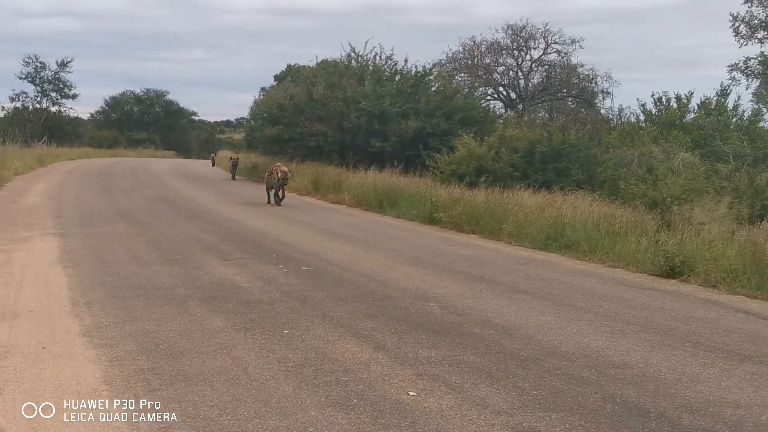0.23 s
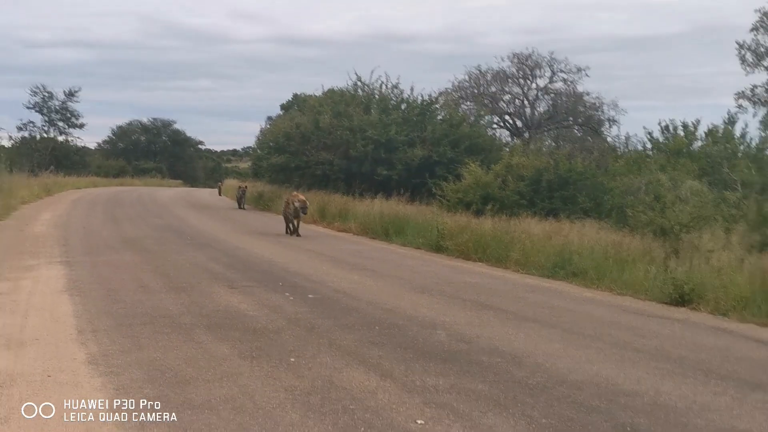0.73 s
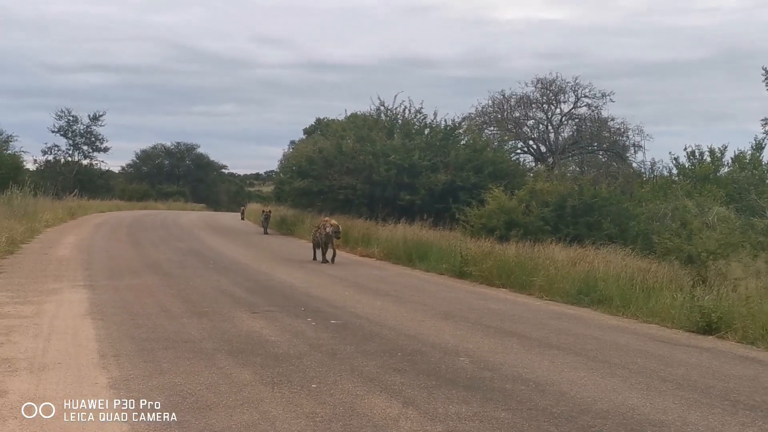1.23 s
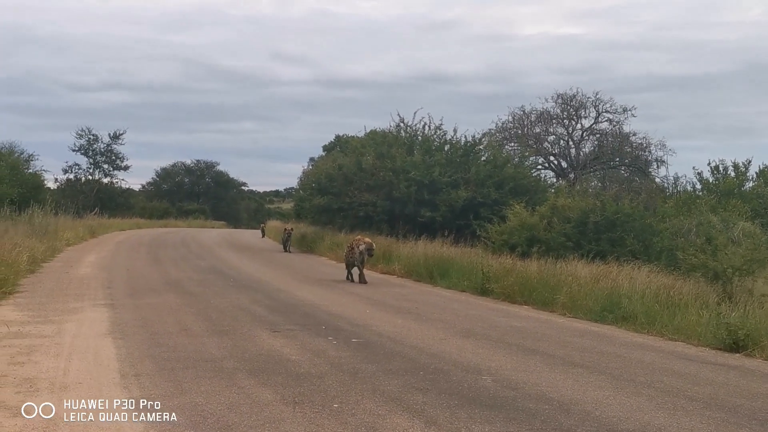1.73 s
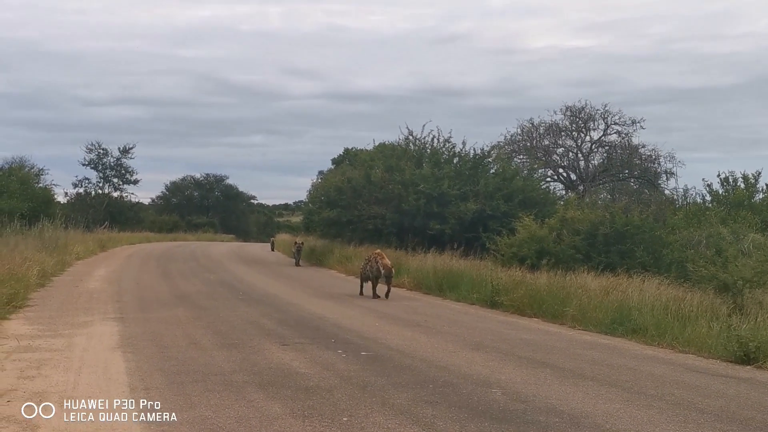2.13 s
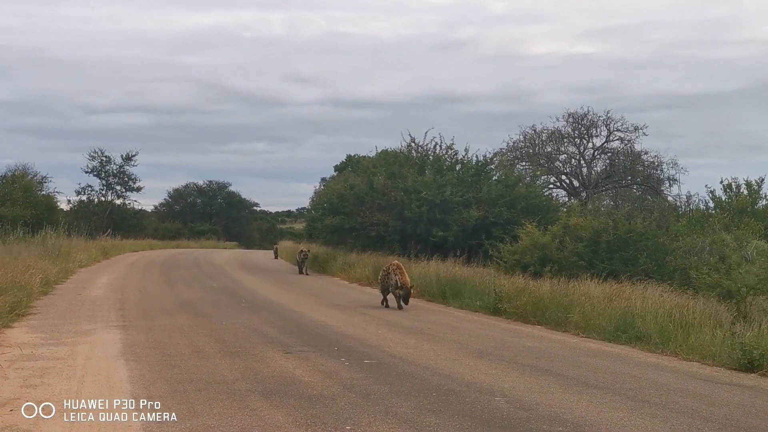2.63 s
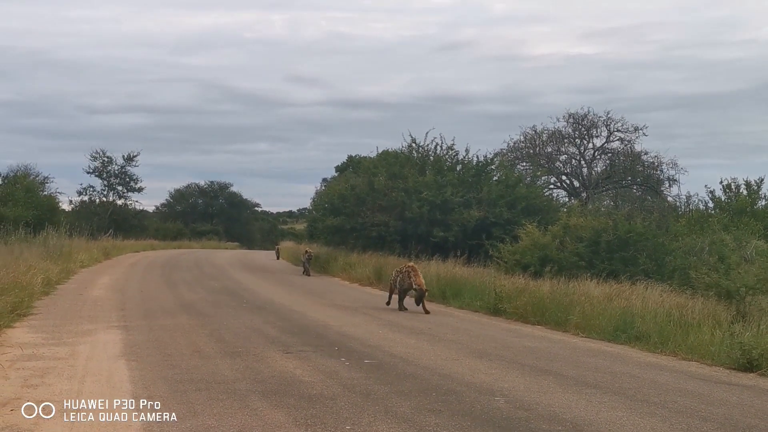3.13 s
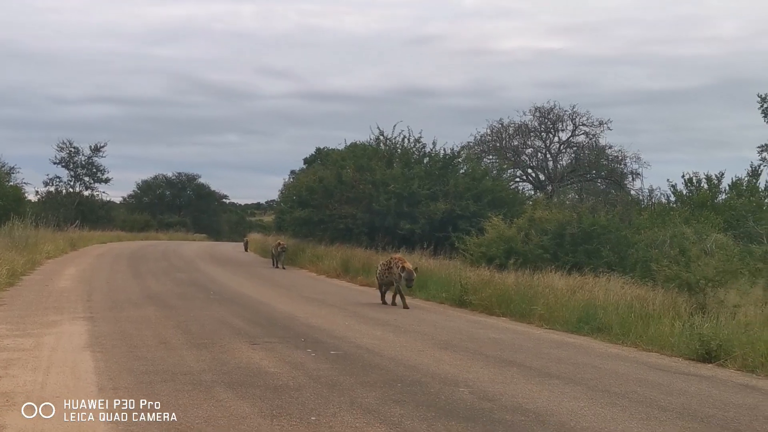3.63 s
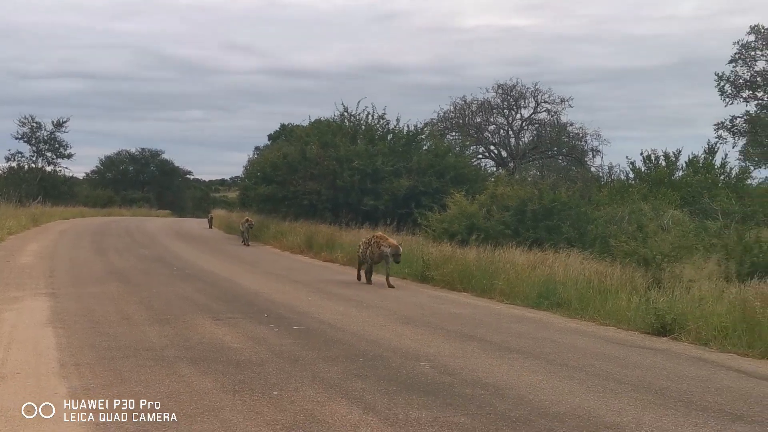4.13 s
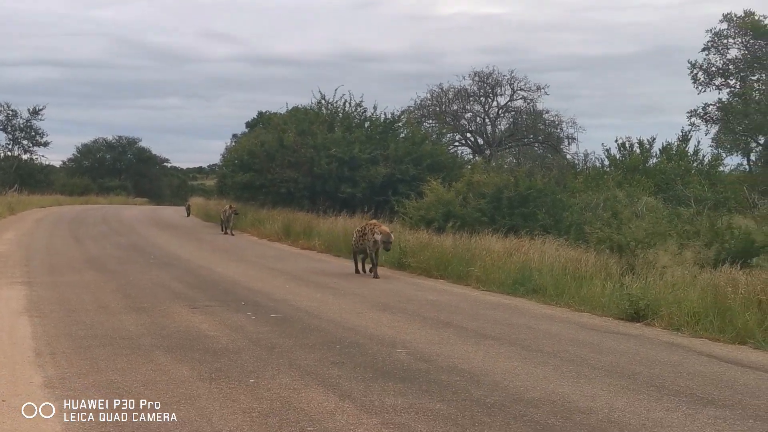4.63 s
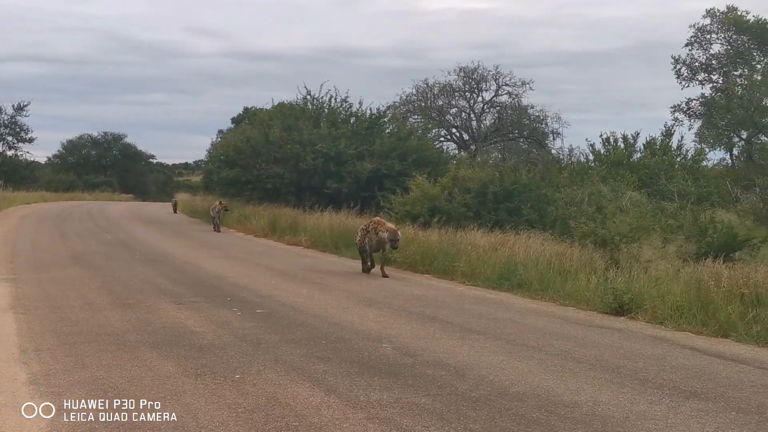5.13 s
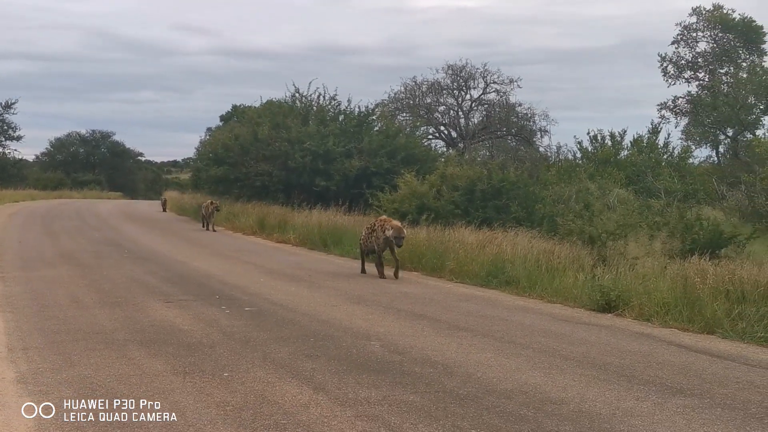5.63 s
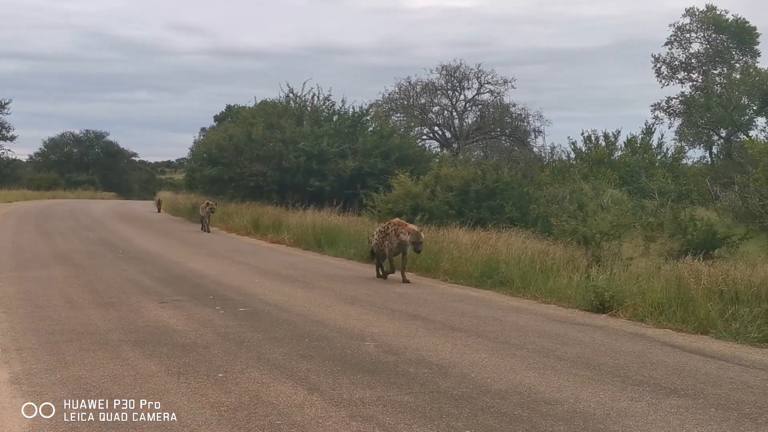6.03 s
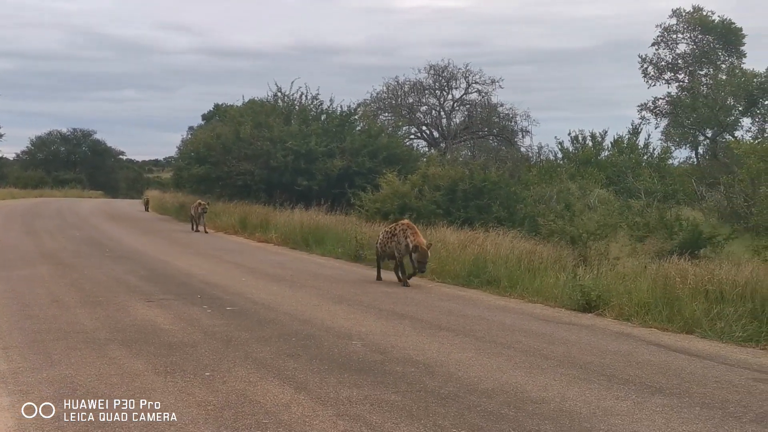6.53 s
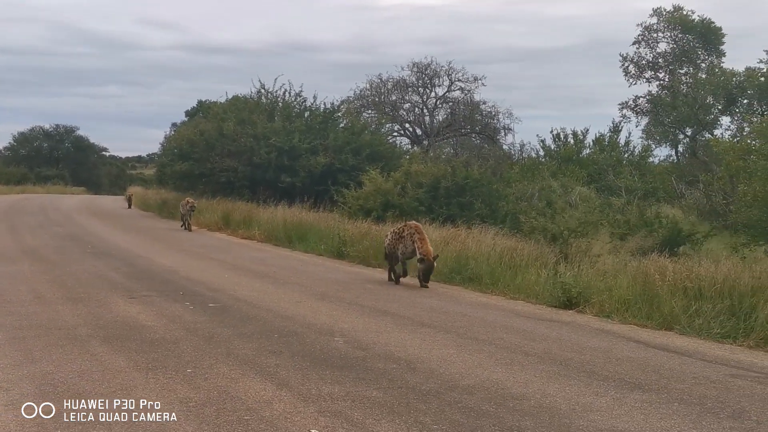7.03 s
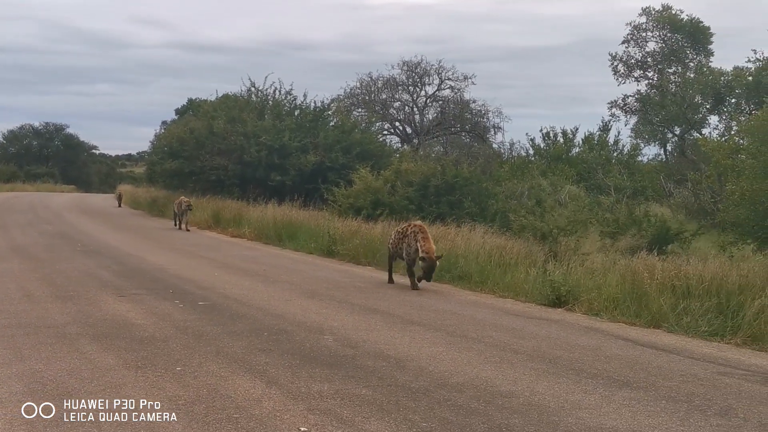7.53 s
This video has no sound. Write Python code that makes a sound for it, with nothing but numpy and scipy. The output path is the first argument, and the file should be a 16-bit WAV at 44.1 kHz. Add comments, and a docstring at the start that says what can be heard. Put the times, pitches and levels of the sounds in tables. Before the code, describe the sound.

Hand-held outdoor stereo capture from a car beside roadside grass and scrub. A nearby bird whistles quick warbled phrases, distant birds twitter softly and insects shimmer high up. A hyena calls twice, loud and hollow: a throaty growling moan swells for under a second, leaps to a clear hoot and falls abruptly, leaving a faint bush echo. A knock comes early, soft wind puffs late.

```python
"""A spotted hyena whoops twice on a road in open bush, heard from an idling car.
Each call is a sum of partials shaped by the throat: a low groan, then a rising hoot that breaks high and falls.
Songbirds are gliding sine tones; insects are a narrow band of noise, partly in pulsed bouts.
Open air and wind are coloured noise, the engine a few sines; a finger knocks and brushes the
hand-held microphone as short pulses and fading hiss. Scattered echoes stand for grass and scrub."""
import sys
import numpy as np
from scipy import signal
from scipy.fft import rfft, irfft
from scipy.io import wavfile
from scipy.ndimage import uniform_filter1d

SR = 44100
rng = np.random.default_rng(int(sys.argv[2]) if len(sys.argv) > 2 else 0)


def store_pcm(level_fs):
    """Save levels as 16-bit WAV."""
    pcm = np.round(np.clip(level_fs, -1, 1) * 32767).astype(np.int16)
    wavfile.write(sys.argv[1], SR, np.atleast_2d(pcm).T)


N = 343098
TIME = np.arange(N) / SR
BINS = np.fft.rfftfreq(N, 1 / SR)
# pitches of a whoop: start of the hoot, just after the voice breaks, and the top
HOOT_HZ, BREAK_HZ, TOP_HZ = 354.3, 544, 705


def gain_of(db):
    """Level is logarithmic: 20 dB are a factor of ten in amplitude."""
    return 10 ** (np.asarray(db) / 20)


def evened(x):
    """Mean power sets the level: scales to rms 1."""
    return x / np.sqrt(np.mean(x ** 2) + 1e-20)


def read(points, hz):
    """Spectra are interpolated on a logarithmic frequency axis."""
    f, value = np.transpose(points)
    return np.interp(np.log(hz + 1), np.log(f + 1), value)


def follow(rows, t):
    """Linear interpolation of every column of a curve table at t."""
    s, *columns = np.transpose(rows)
    return [np.interp(t, s, c) for c in columns]


def ramp(x, low, high):
    """A clipped linear transition, from 0 at low to 1 at high."""
    return np.clip((x - low) / (high - low), 0, 1)


def add(mix, s, sound):
    """Superposition: sums a sound into the mix at time s."""
    part = mix[round(s * SR):][:len(sound)]
    part += sound[:len(part)]


def waver(size, hz):
    """Low-pass noise of rms 1: a random fluctuation slower than about hz."""
    f = np.fft.rfftfreq(size, 1 / SR)
    return evened(irfft(rfft(rng.standard_normal(size)) / (1 + (f / hz) ** 4), size))


def noise(spectrum, band=(0, SR)):
    """Spectral shaping of white noise, scaled to rms 1 inside the band."""
    z = rfft(rng.standard_normal(N)) * gain_of(read(spectrum, BINS))
    in_band = (BINS >= band[0]) * (BINS <= band[1])
    return irfft(z, N) / np.std(irfft(z * in_band, N))


def ports(x, balance_db, phase=0):
    """Interchannel level and phase place a sound; the mean of the two ports is kept."""
    ratio = gain_of(balance_db) * np.exp(1j * phase)
    weights = np.array([2 * ratio / (1 + ratio), 2 / (1 + ratio)]).reshape(2, -1)
    return irfft(rfft(x) * weights, N)


def span(start, end, fade=.004):
    """Sample times of a sound and a sine-shaped envelope that avoids clicks at its edges."""
    t = np.arange(start - fade, end + fade, 1 / SR)
    from_edge = np.minimum(t - t[0], t[-1] - t)
    return t, np.sin(np.pi / 2 * np.clip(from_edge / (2 * fade), 0, 1))


def idle(left_db=5, level_db=0):
    """Periodic combustion gives a line spectrum: the firing rate and its overtones, wavering slightly."""
    # Each row: frequency in Hz, relative level in dB.
    engine_lines = [(34, -63), (68, -77.5), (102, -64.5)]
    # Each row: time in seconds, relative level in dB.
    engine_level = [(0, -6), (1.5, -7.5), (2.0, -1), (4.4, -.5), (7.8, -7)]
    clock = np.cumsum(1 + .004 * waver(N, 4.3)) / SR
    hum = np.zeros(N)
    for hz, db in engine_lines:
        hum += gain_of(db + waver(N, 4)) * np.sin(2 * np.pi * (hz * clock + rng.random()))
    level = gain_of(follow(engine_level, TIME)[0] + level_db)
    return ports(np.sqrt(2) * hum * level, left_db)


def open_air(air_db=-1, side_db=-5):
    """Diffuse background: a shared noise plus one in opposite phase at the two ports."""
    # Colour of the air. Each row: frequency in Hz, relative level per hertz in dB.
    air_colour = [(20, -11), (45, -5.5), (70, -15), (110, -13), (160, -13), (250, -17), (430, -20),
                  (860, -25), (1400, -25.5), (2400, -29.5), (3600, -33), (4700, -31), (5850, -40.5),
                  (15500, -48.5)]
    # Each row: time in seconds, relative level in dB.
    air_level = [(0, -71.5), (1.2, -74), (2, -71), (3.6, -69), (6.4, -72), (7.8, -65.5)]
    # Balance of the shared noise. Each row: frequency in Hz, left minus right in dB.
    air_balance = [(60, 7), (180, 7.5), (550, 2), (1650, 3.5), (4970, 14.5), (15000, -3.5)]
    mid = noise(air_colour, band=(250, 2500))
    side = noise(air_colour, band=(250, 2500))
    air = ports(mid, read(air_balance, BINS)) + gain_of(side_db) * np.array([side, -side])
    return air * gain_of(follow(air_level, TIME)[0] + air_db)


def insects(insects_db=-3, pulsing=0.74):
    """Amplitude modulation of narrow-band noise: a trill pulses in bouts over a steady far chorus."""
    # Each row: start of a bout in seconds, length in seconds, relative level in dB.
    trill_bouts = [(-.1, 1, -76), (.97, .23, -80), (1.996, .6, -81), (4.285, 0.27, -76.5), (5.45, .4, -84)]
    pulses_per_s, chorus_db = 53, -85
    band_colour = [(3800, -52), (4500, -0.5), (4800, 5), (5050, -10), (5700, -48.5)]  # Hz, dB
    shrill = np.array([noise(band_colour) for port in range(2)])
    bouts = np.zeros(N)
    for s, length, db in trill_bouts:
        bouts += gain_of(db) * np.sqrt(abs(np.sin(np.pi * ramp(TIME, s, s + length))))
    rate = pulses_per_s * (1 + 0.0405 * waver(N, 10))
    pulses = 1 + pulsing * np.sin(2 * np.pi * np.cumsum(rate) / SR)
    shrill *= gain_of(insects_db) * (bouts * pulses + gain_of(chorus_db))
    return shrill * gain_of([[2], [-1]])  # slightly stronger on the left


def finger(rebound=16.0):
    """Impulse and friction: knocks are brief pressure pulses, brushes are fading broadband hiss."""
    # Knocks on the case. Each row: time in seconds, nominal peak in dB, width in seconds.
    finger_knocks = [(0.722, -33.5, 0.000058), (.797, -14, 0.00017), (0.8452, -28.5, 0.000071),
                     (.846, -27, 0.0003)]
    # Each row: start in seconds, relative level in dB, decay time in seconds.
    finger_brushes = [(0.802, -37.5, 0.014), (.812, -53, 0.014), (1.41, -63, 0.25)]
    # Colour of a brush. Each row: frequency in Hz, relative level per hertz in dB.
    brush_colour = [(60, 32), (300, 15.5), (900, 7), (3000, 9.5), (6300, 8), (9000, 7.5), (16000, -2.5)]
    out, t = np.zeros(N), np.arange(-.01, .01, 1 / SR)
    for s, db, width in finger_knocks:
        push = np.exp(-(t / width) ** 2)
        slow_rebound = np.exp(-(t / (rebound * width)) ** 2) / rebound
        add(out, s + t[0], gain_of(db) * (slow_rebound - push))
    hiss = noise(brush_colour)
    for s, db, decay in finger_brushes:
        out += hiss * gain_of(db) * (TIME > s) * np.exp(-abs(TIME - s) / decay)
    return out


def wind():
    """Turbulent pressure at a port is low-frequency noise: single puffs and a light, uneven breeze."""
    # The strongest puffs. Each row: centre in seconds, relative level in dB, half length in seconds.
    wind_puffs = [(4.428, -52.5, .047), (5.48, -53, .06), (6.367, -52.5, .05), (6.68, -48.5, 0.079),
                  (6.888, -35.5, 0.044), (7.118, -48.5, 0.11)]
    breeze_from_s, breeze_db, gusts_db = 4.28, -64, 2.5
    rumble = noise([(10, -4.5), (30, 6.5), (66, 7.5), (110, -7), (300, -21.0), (1000, -69)])  # Hz, dB
    strength = gain_of(breeze_db + gusts_db * waver(N, 2.8))
    strength *= ramp(TIME, breeze_from_s, breeze_from_s + .5)
    for s, db, half in wind_puffs:
        strength += gain_of(db) * np.exp(-((TIME - s) / half) ** 2)
    return rumble * strength


def handling(leak_db=-36):
    """Near-field disturbance: finger and wind act on the left port and leak weakly to the right."""
    left = finger() + wind()
    return np.array([left, gain_of(leak_db) * left])


def syllable(length, pitches, db, quaver=0.015, flicker_db=2, soft=0.51):
    """Frequency modulation: a whistle glides along a polynomial through its pitches."""
    u = np.linspace(0, 1, round(length * SR))
    knots = np.linspace(0, 1, len(pitches))
    hz = np.polyval(np.polyfit(knots, pitches, len(pitches) - 1), u)
    tone = np.sin(2 * np.pi * np.cumsum(hz * (1 + quaver * waver(len(u), 90))) / SR)
    level = gain_of(db + flicker_db * waver(len(u), 100))
    return level * evened(tone * signal.windows.tukey(len(u), soft))


def phrase(level_db, top_hz, sag, edges, warble_hz=55, quaver=.009, flicker_db=2, soft=0.056):
    """Coupled frequency and amplitude modulation: one whistle sinks, dipping at each syllable's edge."""
    dip_hz, dip_growth_hz_per_s = 478, 1700  # dips deepen as the phrase goes on
    dip_fall_s, dip_rise_s = .016, 0.009  # it slides into a dip and springs out
    dip_db_per_hz = -0.0192  # and is weaker down there
    hold_s, fade_db_per_s = 0.24, -45  # the end of a long phrase fades
    t = np.arange(edges[0], edges[-1], 1 / SR)
    age = t - t[0]
    dip = np.zeros(len(t))
    for s in edges:
        depth_hz = dip_hz + dip_growth_hz_per_s * (s - t[0])
        dip += depth_hz * np.exp(-abs(t - s) / np.where(t < s, dip_fall_s, dip_rise_s))
    hz = top_hz - sag * age ** 2 - dip + warble_hz * waver(len(t), 30)
    hz *= 1 + quaver * waver(len(t), 120)
    db = level_db + dip_db_per_hz * dip + fade_db_per_s * np.maximum(age - hold_s, 0)
    db += flicker_db * waver(len(t), 78)
    tone = np.sin(2 * np.pi * np.cumsum(hz) / SR)
    return t[0], np.sqrt(2) * gain_of(db) * tone * signal.windows.tukey(len(t), soft)


def songbird():
    """Near-sinusoidal whistling: warbled phrases, single rising peeps and thin falling whistles."""
    # Each row: relative level in dB, top pitch in Hz, sag in Hz per second squared,
    # list of the edges of the syllables in seconds.
    song_phrases = [(-66, 3950, 11000, [0.996, 1.082, 1.155, 1.24]),
                    (-57, 3980, 2800, [1.414, 1.527, 1.599, 1.685, 1.768]),
                    (-54.5, 4050, 4000, [1.892, 2.006, 2.083, 2.163]),
                    (-57, 3970, 5200, [2.319, 2.435, 2.517, 2.598]),
                    (-47.5, 4085, 5000, [4.706, 4.782, 4.88, 4.966, 5.036]),
                    (-50, 3977, 4600, [5.172, 5.28, 5.353, 5.433, 5.518]),
                    (-51, 4060, 5800, [5.647, 5.759, 5.845, 5.924, 5.995])]
    # Each row: start in seconds, length in seconds, middle pitch in Hz, relative level in dB.
    rising_peeps = [(6.194, 0.06, 3680, -57), (6.282, 0.054, 3750, -54), (6.438, .036, 4220, -60.5),
                    (6.522, 0.046, 4080, -57.5)]
    # Each row: start in seconds, length in seconds, pitch at start, middle and end in Hz,
    # relative level in dB.
    falling_slurs = [(2.78, .17, 6790, 5760, 4620, -69), (3.281, .13, 6270, 5310, 3830, -60)]
    peep_rise = 0.038  # share of the pitch, either way
    out = np.zeros(N)
    for row in song_phrases:
        add(out, *phrase(*row))
    for s, length, hz, db in rising_peeps:
        add(out, s, syllable(length, (hz * (1 - peep_rise), hz * (1 + peep_rise)), db, soft=.6))
    for s, length, *pitches, db in falling_slurs:
        add(out, s, syllable(length, pitches, db, quaver=.004))
    return out


def far_birds(far_db=-2):
    """Short tone pulses: level notes, a quick twitter and bubbling trills of distant birds."""
    # Each row: start in seconds, length in seconds, pitch in Hz, relative level in dB.
    far_notes = [(1.31, 0.07, 2420, -77.5), (1.53, 0.063, 820, -72), (1.66, 0.15, 813, -74.5),
                 (1.91, 0.068, 2075, -76.5), (3.88, 0.062, 874, -72), (5.36, 0.052, 843, -72)]
    # Each row: middle of a burst's first note in seconds, relative level in dB.
    twitter_bursts = [(3.511, -70.5), (3.65, -72.5), (3.803, -78)]
    # Four notes a burst, the third strongest: one value a note, added level in dB.
    twitter_accents = [-6, -6, 3, -8]
    # Each row: start in seconds, length in seconds, nominal pitch in Hz, relative level in dB.
    bubbling_trills = [(4.331, 0.45, 896, -79), (5.791, .43, 884, -77.5)]
    twitter_step_s = .0215
    out = np.zeros(N)
    for s, length, hz, db in far_notes:
        add(out, s, syllable(length, (hz, hz), db + far_db))
    for s, db in twitter_bursts:
        for k, accent_db in enumerate(twitter_accents):
            note = syllable(.02, (1900, 2950, 1900), db + accent_db, soft=0.2)
            add(out, s - .01 + k * twitter_step_s, note)
    for s, length, hz, db in bubbling_trills:
        for start in np.arange(s, s + length, .03):
            pitches = hz * rng.uniform(0.98, 1.0) * np.array([.85, 1.06, .85])
            add(out, start, syllable(0.018, pitches, db))
    return out


def verge(x, count=8):
    """Early reflections from the roadside grass: a few taps, other ones at each port, weak in the bass."""
    taps = np.zeros((2, SR // 10))
    for port in taps:
        delay = rng.uniform(.01, .09, count)
        port[(delay * SR).astype(int)] = rng.choice([-1, 1], count) * np.exp(-delay / 0.089)
    colour = gain_of(read([(300, -13.5), (800, -8.0), (1500, -0.5), (2200, 7), (5000, 3.0)], BINS))
    return irfft(rfft(x) * rfft(taps, N) * colour, N)


def scrub(x, build=.03):
    """Multiple scattering by bushes: sparse echoes that swell, then die faster in the highest treble."""
    # Each row: frequency in Hz, reverberation time (60 dB decay) in seconds.
    bush_decay = [(200, 0.6), (500, 0.57), (1500, 0.67), (4000, 0.57), (12000, 0.18)]
    taps = rng.standard_normal((2, SR)) * (rng.random((2, SR)) < 2500 / SR)
    hz, t, z = signal.stft(taps, SR, nperseg=256)
    z[1] = np.where(hz[:, None] < 1100, z[0], z[1])  # long waves reach both ports alike
    z *= gain_of(-60 * t / read(bush_decay, hz)[:, None]) * (1 - np.exp(-t / build))
    tail = signal.istft(z, SR, nperseg=256)[1]
    return signal.fftconvolve(x[None], tail / np.linalg.norm(tail[0]), axes=1)[:, :N]


def birds(song_db=-3, song_left_db=12, far_left_db=3, song_echo_db=-25, far_echo_db=-7, verge_db=-23):
    """Direct-to-reverberant ratio tells distance: a near songbird on the left, others farther off."""
    near, far = gain_of(song_db) * songbird(), far_birds()
    direct = ports(near, song_left_db) + ports(far, far_left_db)
    echoes = scrub(gain_of(song_echo_db) * near + gain_of(far_echo_db) * far)
    return direct + gain_of(verge_db) * verge(near) + echoes


def lag(throat, hz):
    """Minimum phase: the Hilbert transform of the throat's log gain gives each partial's phase."""
    f = np.fft.fftfreq(4096, 1 / SR)
    phase = -signal.hilbert(np.log(gain_of(read(throat, abs(f))))).imag
    return np.interp(hz, f[:len(f) // 2], phase[:len(f) // 2])


def swell(age, soft_db):
    """Vocal effort in dB rises linearly from a soft start as a call gets going."""
    swell_s = .13
    return soft_db * np.clip(1 - age / swell_s, 0, 1)


def ripple(hz, spacing_hz=395, depth_db=4):
    """Tube resonance: the long throat's higher resonances lie evenly spaced."""
    return depth_db * np.cos(2 * np.pi * hz / spacing_hz) * np.clip((hz - 1500) / 400, 0, 1)


def groan(start, end, pitch, level_db, start_db, tone_db, shimmer=0.029, mouth_hz=820,
          mouth_width_hz=200, mouth_share=0.38, bright_share=0.13, uneven_db=4.0, drift_db=2.0):
    """Source and filter: a low harmonic stack whose mouth resonance and brightness swell with effort."""
    # Throat resonances. Each row: frequency in Hz, relative level in dB.
    groan_throat = [(126, -42.5), (160, -42), (200, -23.5), (292, -14), (405, 0), (504, -13), (726, -15.5),
                    (827, -5.5), (953, -26.5), (1100, -28), (1290, -27), (1480, -39), (1650, -38),
                    (1850, -47.5), (2400, -55), (3000, -75.5), (3500, -54), (4000, -67.5), (5100, -77.5)]
    # Unevenness of the lower partials. Each row: number of the partial, added level in dB.
    partial_levels = [(2.0, -0.5), (3.0, -5.5), (4.0, -12.5), (5.0, -5), (6.0, -1.5), (7.0, -7.5),
                      (8.0, -3.5), (9.0, -2.4), (10.0, -2)]
    push_s, push_db = .07, 4.5  # pushed harder just before the hoot
    t, edges = span(start, end)
    hz, soft_db = follow(pitch, t)[0], swell(t - start, start_db)
    effort_db = soft_db + push_db * np.exp((t - end) / push_s)
    mouth_db = mouth_share * soft_db
    bright_db = tone_db + bright_share * soft_db + drift_db * waver(len(t), 8)
    turn = 2 * np.pi * np.cumsum(hz * (1 + .0015 * waver(len(t), 60))) / SR
    # reflections from road and car scatter the level and phase of the short waves
    grid = np.arange(0, 7000, 90)
    bumps, shifts = rng.standard_normal((2, len(grid)))
    out = np.zeros(len(t))
    for k in range(1, 41):
        f = k * hz
        db = read(groan_throat, f) + follow(partial_levels, k)[0] + ripple(f)
        db += mouth_db * np.exp(-((f - mouth_hz) / mouth_width_hz) ** 2)
        db += bright_db * np.clip((f - 700) / 600, 0, 1)
        db += uneven_db * np.clip((f - 900) / 600, 0, 1) * np.interp(f, grid, bumps)
        shift = 2 * np.clip((f - 450) / 500, 0, 1) * np.interp(f, grid, shifts)
        out += gain_of(db) * np.cos(k * turn + lag(groan_throat, f) + shift)
    edges = edges * np.clip((t - t[0]) / .011, 0, 1) ** 4  # the folds catch suddenly
    level = gain_of(effort_db + level_db) * (1 + shimmer * waver(len(t), 87))
    return t[0], np.sqrt(2) * out * edges * level


def glide(t, start, crack, peak, break_s=0.0057):
    """Register break: pitch climbs, breaks, arches and falls; also returns how far it has broken, 0-1."""
    climb_hz, strain_hz, strain_power = 87.07, 68.3, 7  # an even climb, then ever faster
    arch_power = 1.5
    rest_hz, half_fall_s, fall_power = 309, .048, 2.8
    u, broken = ramp(t, start, crack), ramp(t, crack - break_s, crack + break_s)
    climb = HOOT_HZ + climb_hz * u + strain_hz * u ** strain_power
    arch = TOP_HZ - (TOP_HZ - BREAK_HZ) * ramp(t, peak, crack) ** arch_power
    fall = rest_hz + (TOP_HZ - rest_hz) / (1 + (abs(t - peak) / half_fall_s) ** fall_power)
    return np.where(t < peak, climb + broken * (arch - climb), fall), broken


def whoop(start, end, crack, peak, level_db, shrill_db, roll_db=-0.46, flutter_hz=158, flutter=.08,
          clear_hz=530, flicker_db=3, slack_db=6, dull_db=-95, fade=0.026):
    """Phase modulation: the groan's slow vibration lingers as sidebands of the hoot until it breaks high."""
    # Throat resonances. Each row: frequency in Hz, relative level in dB.
    whoop_throat = [(335.0, -12), (454.0, -10), (585.0, -3.5), (729.0, -9.5), (987.0, -21.5),
                    (1371.0, -22.5), (1709.0, -31), (2044.0, -40.5), (2458.0, -43.5), (2901.0, -64.5),
                    (3379.0, -57.5), (4213.0, -52.5), (4647.0, -55.5), (5445.0, -81.5)]
    strain_from_hz, strain_db, break_db = 420, -7, -12.5  # fundamental weakens under strain and at the break
    shut_db, open_db, open_hz = -14.5, 4, 472  # the mouth opens with the climb and frees the octave
    octave_break_db, octave_top_db = -3.5, 4  # after the break the octave grows again with pitch
    bright_low_db, bright_top_db = -13.5, 5  # the upper overtones grow with pitch
    # in the fall the closing mouth rings with the fundamental
    flare_hz, flare_width_hz, flare_db, flare_octave_db = 590, 64, 10, -13
    dying_s, dying_db = .05, -19  # the end of the fall dies away
    t, edges = span(start, end)
    hz, broken = glide(t, start, crack, peak)
    rising = t < peak
    turn = 2 * np.pi * np.cumsum(hz * (1 + .004 * waver(len(t), 250))) / SR
    slow = np.sin(2 * np.pi * np.cumsum(flutter_hz * (1 + .06 * waver(len(t), 90))) / SR)
    slow *= np.clip((clear_hz - hz) / 40, 0, 1) * rising
    slack = ~rising * (1 - hz / TOP_HZ)  # the folds relax in the fall and lose their overtones
    flare = ~rising * np.exp(-((hz - flare_hz) / flare_width_hz) ** 2)
    first_db = break_db * broken + flare_db * flare
    first_db += strain_db * (1 - broken) * ramp(hz, strain_from_hz, BREAK_HZ)
    octave_db = (shut_db - open_db) * ramp(hz, open_hz, HOOT_HZ) + flare_octave_db * flare
    high_octave_db = np.interp(hz, [BREAK_HZ, TOP_HZ], [octave_break_db, octave_top_db]) + shrill_db
    octave_db += (1 - broken) * open_db + broken * high_octave_db
    bright_db = np.interp(hz, [HOOT_HZ, TOP_HZ], [bright_low_db, bright_top_db]) + dull_db * slack ** 2
    out = np.zeros(len(t))
    for k in range(1, 13):
        f = k * hz
        if k == 1:
            db = first_db
        elif k == 2:
            db = octave_db
        else:
            db = bright_db + flicker_db * waver(len(t), 35)
        db = db + read(whoop_throat, f) + (roll_db - slack_db * slack) * max(k - 3, 0)
        swing = min(flutter * (k ** 2 - .5), 1)  # higher overtones are shaken more
        out += gain_of(db) * np.cos(k * turn + lag(whoop_throat, f) + swing * slow)
    effort_db = level_db + dying_db * ramp(t, t[-1] - dying_s, t[-1])
    return t[0], np.sqrt(2) * out * edges * gain_of(effort_db) * ramp(t, t[-1], t[-1] - fade)


def patches(size, depth_db, width=10, count=14):
    """Time-frequency modulation: noise whose colour drifts in patches several hundred Hz wide."""
    # Air rushing through the voice. Each row: frequency in Hz, relative level per hertz in dB.
    rasp_colour = [(150, 2), (400, 16), (900, 17), (1500, 12), (2200, 4), (2900, -4), (3600, 4), (4700, 2),
                   (5400, 0), (7000, 0), (11000, -2), (15500, -8)]
    air = noise(rasp_colour, band=(6000, 15000))[:size]
    z = signal.stft(air, SR, nperseg=512, noverlap=384)[2]
    field = uniform_filter1d(rng.standard_normal(z.shape), width, 0)
    field = evened(uniform_filter1d(field, count, 1))
    return signal.istft(z * evened(gain_of(depth_db * field)), SR, nperseg=512, noverlap=384)[1][:size]


def rasp(start, hoot, peak, end, level_db, patchy_db=5, start_db=-13, burst_db=8, burst_s=0.12,
         top_db=7.0, top_s=.06):
    """Turbulence noise: faint air swells with a call, bursts as the hoot starts and again at its top."""
    t, edges = span(start, end, fade=.02)
    db = swell(t - start, start_db)
    db += burst_db * (t > hoot) * np.exp(-((t - hoot) / burst_s) ** 2)
    db += top_db * np.exp(-((t - peak) / top_s) ** 2)
    return t[0], patches(len(t), patchy_db) * edges * gain_of(db + level_db)


def hyena(echo_db=-30.0, rasp_db=-2, rasp_side_db=-5, verge_db=-20):
    """Direct and reflected sound: groan, whoop and rasp of each call, with the echo of the bush."""
    # Each row, one a call: groan start, hoot start, voice break and pitch peak in seconds,
    # then relative levels in dB: groan, its soft start, its brightness, hoot,
    # octave after the break, rasp.
    whoop_calls = [(2.212, 2.930, 3.082, 3.144, -16, -16, 0.5, -5, -1, -74),
                   (6.497, 7.235, 7.433, 7.503, -12.5, -14, -4, -4, 1.4, -70.5)]
    # One list a call. Each row: time in seconds, pitch of the groan in Hz.
    groan_pitches = [
        [(2.215, 97.55), (2.261, 107.4), (2.341, 115.6), (2.463, 121.7), (2.513, 127.7), (2.649, 137.1),
         (2.823, 141.3), (2.891, 146.4), (2.93, 161.7)],
        [(6.497, 100.8), (6.527, 103.3), (6.679, 121.3), (6.759, 127.4), (6.829, 131.1), (7.001, 131.8),
         (7.069, 136.5), (7.197, 146), (7.235, 158.1)],
    ]
    # One list a call. Each row: frequency in Hz, left minus right in dB.
    call_balances = [
        [(200, 4.5), (400, 2), (750, -2), (1300, -1.5), (1850, 14), (2600, 14.5), (4000, 13.5), (6000, 0)],
        [(200, 4.5), (400, 3), (750, 0.5), (1000, 5), (1300, 8.5), (1900, -4), (2600, 2), (3700, 12),
         (6000, 1.5)],
    ]
    # One list a call. Each row: frequency in Hz, lead of the left port in radians.
    call_phases = [
        [(700, 0), (1000, .2), (1300, .9), (2600, -.3), (3700, -1.4)],
        [(700, .1), (1000, .2), (1350, -.9), (1850, -1.2), (2600, -0.0066), (3700, -1.7)],
    ]
    fall_s = .113  # from the pitch peak to the end of a call
    out = np.zeros((2, N))
    for row, pitch, balance, phase in zip(whoop_calls, groan_pitches, call_balances, call_phases):
        start, hoot, crack, peak, groan_db, start_db, tone_db, hoot_db, shrill_db, air_db = row
        end = peak + fall_s
        voice, spread = np.zeros((2, N))
        add(voice, *groan(start, hoot, pitch, groan_db, start_db, tone_db))
        add(voice, *whoop(hoot, end, crack, peak, hoot_db, shrill_db))
        add(voice, *rasp(start, hoot, peak, end, air_db + rasp_db))
        add(spread, *rasp(start, hoot, peak, end, air_db + rasp_side_db))
        spread = irfft(rfft(spread) * (BINS > 4500), N)  # the treble arrives diffusely
        out += ports(voice, read(balance, BINS), read(phase, BINS))
        out += np.array([spread, -spread])
        out += gain_of(echo_db) * scrub(voice) + gain_of(verge_db) * verge(voice)
    return out


def scene():
    """Superposition of every source at the two ports."""
    return idle() + open_air() + insects() + handling() + birds() + hyena()


def record(dry):
    """Band limitation: a linear-phase low-pass filter stands for the recorder."""
    edge_hz = 15800
    low_pass = signal.firwin(511, edge_hz, window=("kaiser", 9), fs=SR)
    return signal.oaconvolve(dry, low_pass[None], "same")


dry = scene()
out = record(dry)
store_pcm(out)
```